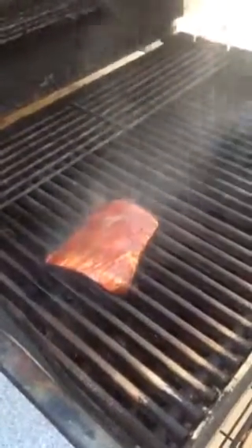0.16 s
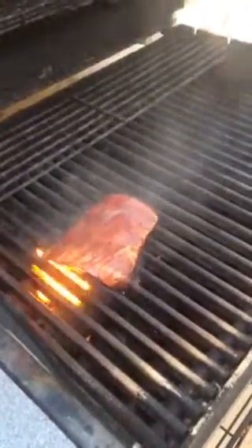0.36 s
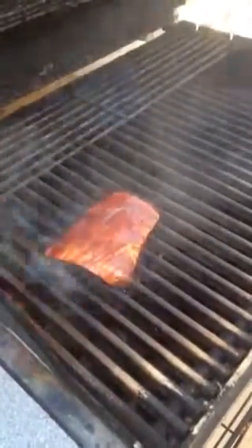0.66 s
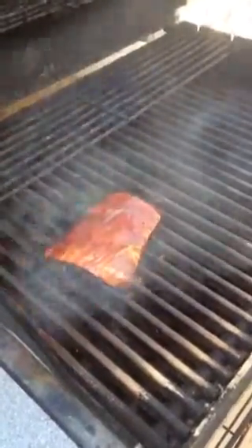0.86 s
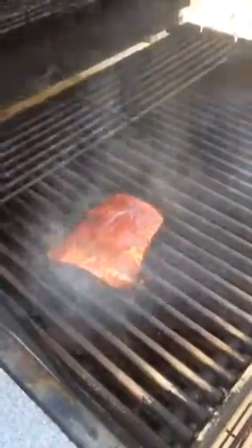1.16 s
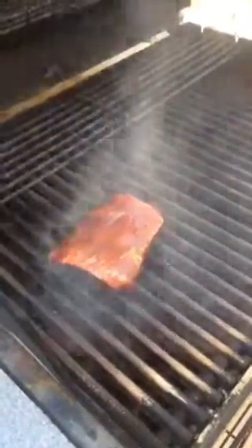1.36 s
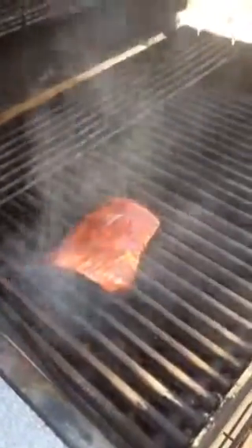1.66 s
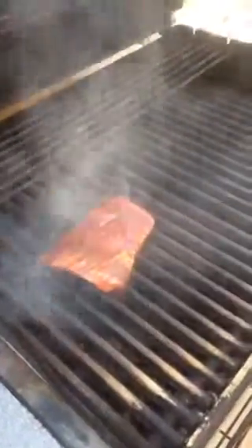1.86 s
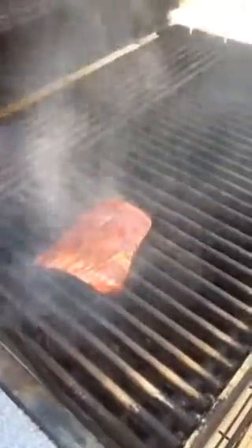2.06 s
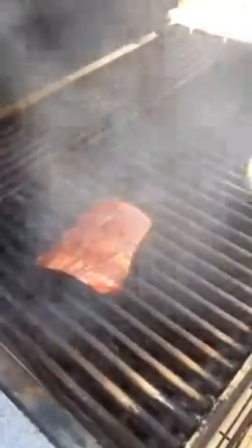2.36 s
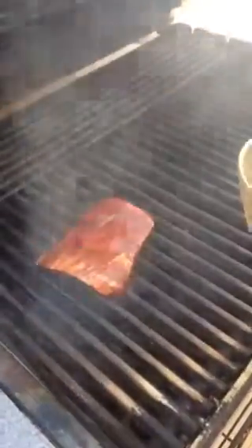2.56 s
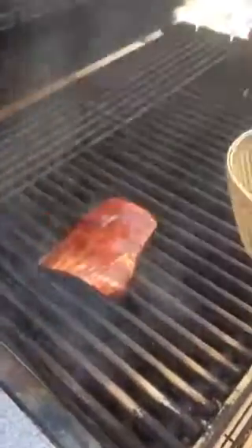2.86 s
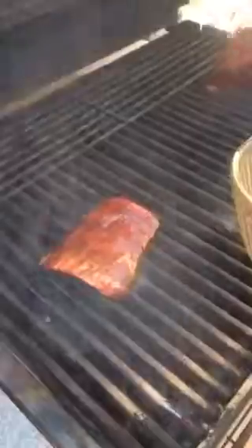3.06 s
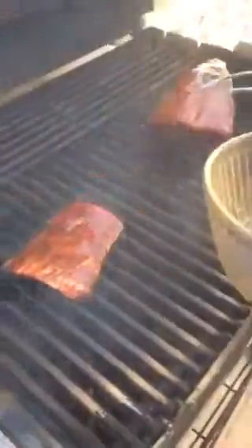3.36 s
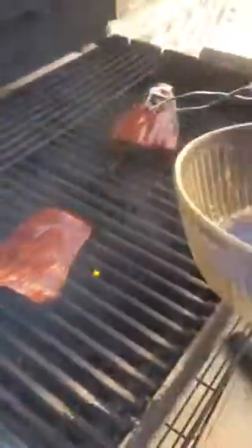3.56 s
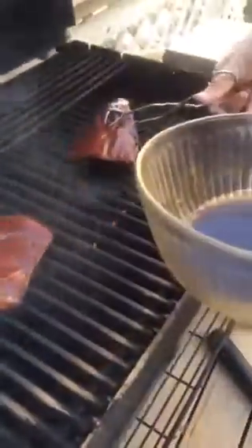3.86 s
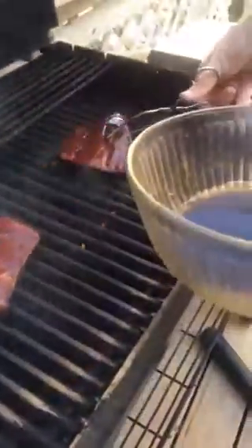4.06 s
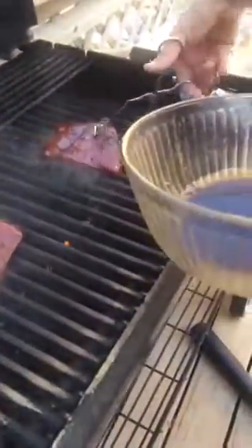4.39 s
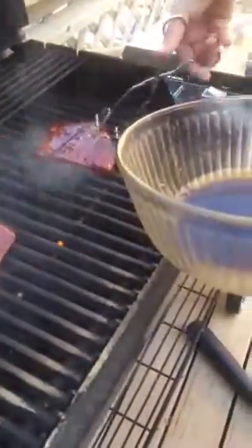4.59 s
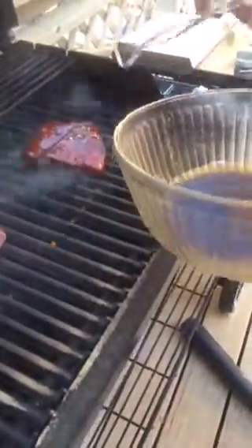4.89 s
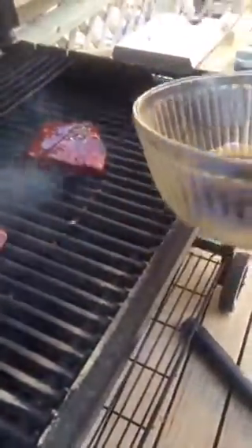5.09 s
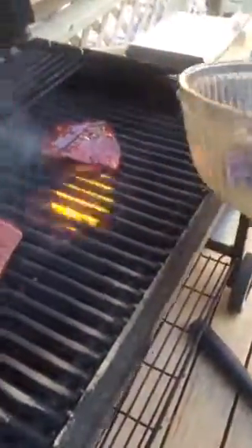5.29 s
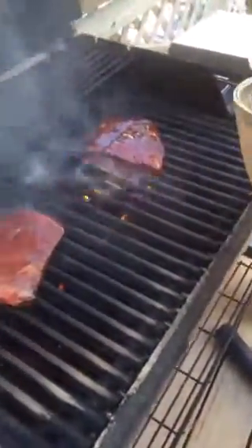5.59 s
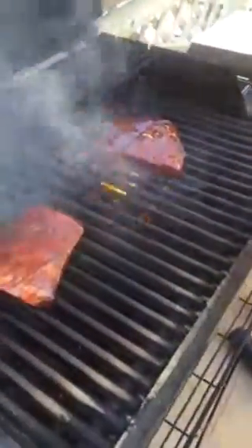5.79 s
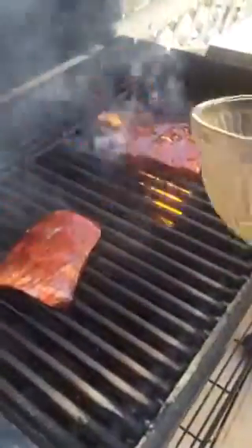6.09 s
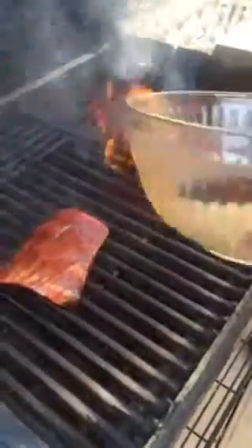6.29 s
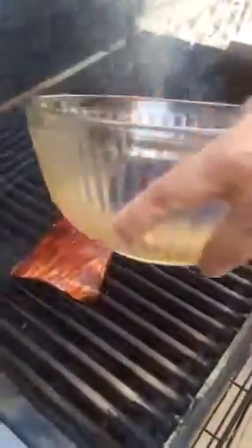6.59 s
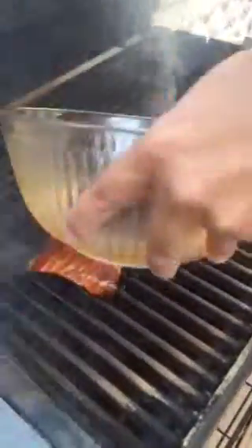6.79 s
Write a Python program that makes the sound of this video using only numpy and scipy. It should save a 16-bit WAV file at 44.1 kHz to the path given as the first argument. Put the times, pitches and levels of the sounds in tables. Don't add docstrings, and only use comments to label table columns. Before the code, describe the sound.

Tongs clink on a glass bowl, then meat sizzles softly on an outdoor grill, growing fiercer with spitting fat, flame flares and rumbling wind.

```python
import sys
import numpy as np
from scipy import signal
from scipy.io import wavfile
from scipy.ndimage import uniform_filter1d

SR = 44100
rng = np.random.default_rng(int(sys.argv[2]) if len(sys.argv) > 2 else 0)


def attenuation_scalar(level_db):
    decades = np.asarray(level_db, float) / 20
    return 10 ** decades


def dump_mix(stems):
    frames = np.atleast_2d(stems).T
    limited = np.clip(frames, -1, 1)
    pcm = np.round(limited * 32767).astype(np.int16)
    wavfile.write(sys.argv[1], SR, pcm)


N = 306054


def evened(x):
    return x / np.sqrt(np.mean(x ** 2) + 1e-20)


def add(mix, s, sound):
    part = mix[round(s * SR):][:len(sound)]
    part += sound[:len(part)]


def clock():
    return np.arange(N) / SR


def column(table, index):
    rows = np.array(table)
    return np.interp(clock(), rows[:, 0], rows[:, index])


def bump(s, half):
    return np.exp(-((clock() - s) / half) ** 2)


def noise():
    return rng.standard_normal(N)


def coloured(x, points):
    f, db = np.transpose(points)
    hz = abs(np.fft.fftfreq(8192, 1 / SR))
    log_gain = np.log(attenuation_scalar(np.interp(np.log(hz + 1), np.log(f), db, -70, -70)))
    response = np.exp(log_gain - 1j * signal.hilbert(log_gain).imag)
    taps = np.fft.ifft(response).real[:4096]
    return signal.oaconvolve(x, taps / np.linalg.norm(taps))[:len(x)]


def flicker(depth_db, seconds):
    size = max(int(seconds * SR), 2)
    wander = uniform_filter1d(uniform_filter1d(noise(), size), size)
    return attenuation_scalar(depth_db * evened(wander))


def bursts(per_s, spread_db):
    size = attenuation_scalar(spread_db * np.minimum(rng.exponential(1, N), 5)) * rng.choice([-1., 1.], N)
    return evened(size * (rng.random(N) < per_s / SR))


def patchy(x):
    depth_db, bins, frames = 1.34, 3, 9
    z = signal.stft(x, nperseg=512, noverlap=384)[2]
    field = uniform_filter1d(rng.standard_normal(z.shape[::-1]), size=frames, axis=0)
    field = evened(uniform_filter1d(field, size=bins, axis=1)).T
    gain = attenuation_scalar(depth_db * field - .115 * depth_db ** 2)
    return signal.istft(z * gain, nperseg=512, noverlap=384)[1][:N]


def spit(points, db, length):
    u = np.arange(1500) / SR / length
    burst = coloured(rng.standard_normal(len(u)) * (1 - np.exp(-4.5 * u)) * np.exp(-u), points)
    return attenuation_scalar(db) * burst / abs(burst).max()


# t/s, level/dB
BOILING = [(0.0, -52), (0.15, -51), (0.37, -47.5), (1.02, -50.5), (1.29, -49.5), (2.16, -54), (3.61, -51),
           (3.81, -47.5), (4.7, -39.5), (5.22, -41), (5.39, -40.5), (5.55, -39.5), (5.74, -40.5),
           (6.11, -37.5), (6.26, -37.5), (6.45, -41.5), (6.69, -44), (6.94, -43.5)]
# centre t/s, level change/dB, half length/s
LULLS = [(.19, 4, .01), (.248, -3, .006), (0.309, -5, 0.028), (.4, -2, .01), (0.56, -2, .03),
         (5.063, -1, .04), (5.192, 4.5, 0.011), (5.238, 1.5, .03), (5.7, 0, .02), (5.84, -3, 0.028),
         (6.295, -4, 0.033), (6.37, -3.5, 0.025)]


def boiling_effort():
    simmer_db, vapour_full_db, lull_reach = -50, 10.5, 0.75
    effort = column(BOILING, index=1) - simmer_db
    lull = sum(db * bump(s, half) for s, db, half in LULLS)
    return effort + lull, np.minimum(effort, vapour_full_db) + lull_reach * lull


def bubbling(sputter, power, crackle, share):
    return evened(sputter ** power * (noise() + share * crackle))


# f/Hz, level/dB
BOIL = [(250, -49), (400, -19.5), (930, -17), (1150, -6), (1300, -10), (1580, -4), (1700, -7.5), (1850, -2),
        (2000, -4), (2300, -2), (3000, -3), (4000, -30)]


def boil(effort, sputter, crackle):
    boil_db = -55 + 0.5 * effort + 0.29 * (flame_db() - BURNER_DB)
    return coloured(bubbling(sputter, 1.18, crackle, 0.35) * attenuation_scalar(boil_db + 2.5), BOIL)


# f/Hz, level/dB
HOLLOW = [(1500, -51), (2200, -12.5), (2400, -6.5), (2520, -5), (2630, 1), (2730, 1.5), (2870, -1),
          (3000, -4), (3100, -11), (3400, -17), (4500, -37)]
# centre t/s, level/dB, half length/s
SURGES = [(0.36, -43.5, 0.062), (0.12, -54, .006), (0.41, -44, .012), (4.59, -53, 0.018),
          (5.385, -45, 0.039), (4.03, -48, 0.0082), (4.102, -43, 0.022), (5.621, -32.5, 0.013),
          (5.862, -35, .006), (5.79, -34, 0.0045), (6.872, -40, .01), (5.65, -40, 0.0047),
          (5.782, -34, 0.0086), (5.961, -36, .006), (5.99, -39, 0.0085), (6.132, -37, 0.018),
          (6.173, -43, .004), (6.221, -35, 0.022), (6.559, -40, 0.015)]


def hollow(effort, sputter, crackle):
    ring = bubbling(sputter, 1, crackle, 0.55) * attenuation_scalar(-52.5 + 1.26 * effort + 0.5)
    surges = noise() * sum(attenuation_scalar(db) * bump(s, half) for s, db, half in SURGES)
    return coloured(ring + surges, HOLLOW)


# f/Hz, level/dB
JETS = [(2600, -26), (3200, -0.5), (3900, -6.5), (4700, -6), (5100, -18.5), (6500, -60)]


def jets(vapour, facing, sputter, crackle):
    jets_db = -59 + 0.79 * vapour + 0.26 * facing
    return coloured(bubbling(sputter, 1, crackle, 0.37) * attenuation_scalar(jets_db + 1.6), JETS)


def steam_level(vapour, facing):
    return -62.5 + 0.86 * vapour + 0.3 * facing


# f/Hz, level/dB
STEAM = [(3500, -31), (5000, -3), (5600, -2.5), (6400, -3), (7000, -1.5), (7700, -4), (9500, -8.5),
         (11500, -18.5), (14000, -58)]


def steam(steam_db, sputter, crackle, drift):
    return coloured(bubbling(sputter, 0.52, crackle, 0.72) * attenuation_scalar(steam_db + 1.2) * drift, STEAM)


# f/Hz, level/dB
MIST = [(5000, -28), (8500, 0.5), (11000, -1.5), (13000, -5), (15500, -8)]


def mist(vapour, facing, sputter, crackle, drift):
    mist_db = -68 + 0.25 * vapour + facing
    return coloured(bubbling(sputter, 0.5, crackle, 0.49) * attenuation_scalar(mist_db + 5.0) * drift, MIST)


# f/Hz, level/dB
DRYING = [(1500, -23), (1950, -11), (2300, -11), (2550, 8), (2900, -5.5), (3400, -7.5), (4500, -53)]


def drying(sputter, crackle):
    start_db, db_per_s = -53.5, 2.05
    return coloured(bubbling(sputter, 1, crackle, 0.75) * attenuation_scalar(start_db - db_per_s * clock()), DRYING)


# f/Hz, level/dB
SPRAY = [(3000, -35), (5000, 20.5), (9000, 16), (15500, 0)]


def pops(steam_db):
    return coloured(bursts(per_s=70, spread_db=2.0) * attenuation_scalar(steam_db - 9.0), SPRAY)


# t/s, level/dB
FACING = [(0, 0), (.5, 0), (.8, 1.5), (1.2, -0.5), (1.45, 2), (2.05, -1), (2.3, -2), (2.45, 1), (3.0, 0),
          (3.3, -9), (3.45, -4), (3.65, -5.5), (4.1, 0.5), (5.2, 0), (5.85, 4.5), (6.3, 1.5), (6.94, 0.5)]


def sizzle():
    effort, vapour = boiling_effort()
    facing = column(FACING, index=1)
    sputter = flicker(0.73, 0.0017) * flicker(0.34, 0.028) * flicker(0.17, 0.011)
    sputter = sputter ** (1 + 0.011 * effort.clip(0))
    drift = flicker(0.52, 0.029)
    crackle = bursts(per_s=2500, spread_db=1.0) + 0.51 * bursts(per_s=240, spread_db=1.3)
    steam_db = steam_level(vapour, facing)
    out = boil(effort, sputter, crackle) + hollow(effort, sputter, crackle)
    out += jets(vapour, facing, sputter, crackle) + steam(steam_db, sputter, crackle, drift)
    out += mist(vapour, facing, sputter, crackle, drift) + drying(sputter, crackle)
    return pops(steam_db) + patchy(out)


# f/Hz, level/dB
WIND = [(13, -62), (22, -33), (39, 0), (67, 6), (124, 4.5), (200, -3), (260, -38), (440, -120)]
# t/s, level/dB
GUSTS = [(0, -57), (.3, -55.5), (.65, -61), (1.4, -57), (1.8, -62), (2.2, -58.5), (3.05, -62),
         (3.28, -51.5), (3.5, -64), (3.95, -62), (4.3, -68), (5.1, -61.5), (5.5, -61), (5.7, -57.5),
         (6.1, -61), (6.94, -62)]


def wind():
    return coloured(noise() * flicker(2.04, 0.012), WIND) * attenuation_scalar(column(GUSTS, index=1) + 2.0)


BURNER_DB = -66
# start t/s, burn/s, level/dB
FLARES = [
    (.33, 0.059, -49.5),
    (.58, 0.27, -65.5),
    (1.15, 0.76, -59.5),
    (3.55, 1, -69),
    (4.5, 0.52, -60),
    (5.27, 0.23, -47.5),
    (5.56, 0.27, -49),
    (5.84, 0.36, -44),
    (6.3, 0.36, -52),
    (6.83, .2, -45),
]


def flame_db():
    catch_s, die_db_per_s = 0.027, 70.
    t, power = clock(), attenuation_scalar(2 * BURNER_DB)
    for s, burn, db in FLARES:
        dying_db = die_db_per_s * (t - s - burn).clip(0)
        power = power + np.clip((t - s) / catch_s, 0, 1) * attenuation_scalar(2 * (db - dying_db))
    return 10 * np.log10(power)


# f/Hz, level/dB
FLAME = [(59, -6), (100, -15.5), (124, -6.5), (200, -2.5), (298, -9.5), (340, -18.5), (500, -16),
         (579, -19.5), (735, -17), (900, -18.5), (1170, -8.5), (1980, -120)]


def flames():
    return coloured(noise() * flicker(2.4, 0.021), FLAME) * attenuation_scalar(flame_db() - 2.0)


# f/Hz, level/dB
MURMUR = [(350, -50), (520, -18), (620, -1.5), (750, 1), (950, -3.5), (1050, -7), (1400, -0.5),
          (2000, -13.5), (3000, -67)]


def traffic():
    passing_db = 3 * bump(2.15, 0.086)
    hidden_db = -7 * (1 + np.tanh((clock() - 2.82) / 0.29)) / 2
    return coloured(noise() * flicker(1.46, 0.016), MURMUR) * attenuation_scalar(-57 + passing_db + hidden_db)


# f/Hz, level/dB
YARD = [(20, -41), (45, -1.5), (90, -9), (250, -12.5), (400, -11.5), (1000, -32), (3000, -50)]


def yard():
    return coloured(noise(), YARD) * attenuation_scalar(-68)


# centre t/s, half length/s, level/dB, f/Hz, width/Hz
WHEEZES = [
    (.04, 0.067, -58, 3850, 500),
    (0.107, .04, -51.5, 3380, 200),
    (0.762, 0.086, -56, 4150, 600),
    (4.076, 0.067, -58, 4300, 700),
]


def wheezes():
    out = np.zeros(N)
    for s, half, db, hz, width in WHEEZES:
        t = np.arange(-.2, .2, 1 / SR)
        complex_noise = [1, 1j] @ rng.standard_normal((2, len(t)))
        fuzz = signal.lfilter([1], [1, -np.exp(-np.pi * width / SR)], complex_noise)
        whistle = evened((fuzz * np.exp(2j * np.pi * hz * t)).real)
        sound = whistle * attenuation_scalar(db) * np.exp(-(t / half) ** 2)
        add(out, max(s + t[0], 0), sound[t > -s])
    return out


# t/s, peak level/dB
CLINKS = [
    (0.169, -20.5),
    (0.213, -14),
    (0.2545, -22.5),
    (0.4105, -19.5),
]
# f/Hz, t60/s, level/dB at each of the four knocks
BOWL = [(313, 0.14, -53, -57, -43, -33), (472, 0.19, -40.5, -31, -31, -25),
        (734, 0.027, -32, -9.5, -30, -11), (1128, 0.08, -25, -16.5, -23, -13),
        (1375, 0.047, -10, -12, -27, -8), (2097, 0.16, -15, -14.5, -7, -8.5),
        (2430, 0.038, -1, -0.5, -19, -3), (2564, 0.12, -14, -12, -7, -2), (3100, 0.025, -4, -1.5, -15, 0),
        (3250, 0.047, -3.5, -28, -20, -5), (3860, 0.051, -25, -17, -21, -7.5),
        (4545, 0.043, -6.5, 3, -15, -3), (6110, 0.065, -21, -22, -24, -19.5),
        (6700, 0.017, -30, -18, -30, -30)]


def tongs():
    out, t = np.zeros(N), np.arange(12000) / SR
    for knock, (s, db) in enumerate(CLINKS):
        modes = sum(attenuation_scalar(levels_db[knock] - 60 * t / t60) * np.sin(2 * np.pi * (hz * t + rng.random()))
                    for hz, t60, *levels_db in BOWL)
        tick = uniform_filter1d(rng.standard_normal(len(t)), size=4) * np.exp(-t / 0.0041)
        add(out, s, attenuation_scalar(db - 7.5) * (modes * (1 - np.exp(-t / 0.0013)) + 0.22 * tick))
        add(out, s, spit(SPRAY, db - 23.0, 0.0033))
    return out


# centre t/s, peak level/dB, f/Hz, lean/rad, narrowness/1
PUFFS = [(0.366, -37, 166, -0.12, 0.82), (0.468, -48, 210, 0.47, 0.34), (1.27, -54, 310, 0.38, .25),
         (2.108, -37.5, 120.7, -0.24, 1.6), (3.297, -18.5, 84.4, 0.35, 2.3), (3.384, -29, 83.5, 0.17, 1.9),
         (6.111, -31.5, 208, 0.22, 0.67), (6.3144, -26, 130, -0.28, 1.86), (6.316, -31, 70, -0.48, 1.3),
         (6.359, -23.5, 78, -1.5, 1.44), (6.35, -36.5, 193, 0.27, 0.59)]


def puffs():
    out, t = np.zeros(N), np.arange(-1500, 1500) / SR
    for s, db, hz, lean, narrow in PUFFS:
        swing = np.cos(2 * np.pi * hz * t + lean)
        add(out, s + t[0], -attenuation_scalar(db) * np.exp(-(narrow * hz * t) ** 2) * swing)
    return out


# f/Hz, level/dB
THUD = [(120, 0), (300, -2.5), (700, 16), (1100, -7), (2500, -45)]
# t/s, peak level/dB, treble level/dB, thud level/dB
SPITS = [(0.592, -32, -23, -29), (0.604, -33, -29.5, -33), (0.6797, -31, -15, -29), (1.413, -46, -7, -5),
         (1.767, -47, -27.5, -8), (2.0714, -38, -23, -11), (3.191, -46, -22, -2), (4.152, -36.5, -10, -10),
         (4.582, -39, -27, -27), (5.099, -35.5, -22, -15), (5.1484, -28, -27, -41), (5.195, -34, -12, -32),
         (5.424, -27, -22, -26), (5.555, -26, -23, -30), (5.668, -21, -14, -24), (5.721, -29, -8, -29),
         (5.7345, -24, -31, -30), (5.7594, -20, -28, -37), (5.7683, -24, -19, -33), (5.856, -26, -25, -33),
         (5.876, -34, -13, -29), (5.9137, -24, -12, -35), (5.92, -32, -20, -25), (6.1443, -29.5, -30, -13),
         (6.339, -26.5, -25, -24), (6.537, -26, -7, -28), (6.5743, -36, -22, -13), (6.69, -39, -21, -31),
         (6.8619, -27.5, -14, -27)]


def spits():
    out, length = np.zeros(N), 0.002
    for s, db, treble_db, thud_db in SPITS:
        add(out, s, spit(HOLLOW, db - 1.0, length))
        add(out, s, spit(BOIL, db - 4, length))
        add(out, s, spit(JETS, db - 19, length))
        add(out, s, spit(SPRAY, db + treble_db + 2.0, 0.42 * length))
        add(out, s, spit(THUD, db + thud_db + 3.0, length))
    return out


def scene():
    air = wind() + patchy(flames() + traffic()) + yard()
    return (sizzle() + air + wheezes() + tongs() + puffs() + spits())[None]


def low_pass(x):
    return signal.sosfilt(signal.butter(12, 15830, fs=SR, output="sos"), x)


def record(dry):
    edge = signal.firwin(2047, 15290, window=("kaiser", 9), fs=SR)
    mix = signal.oaconvolve(dry, edge[None], "same")
    return low_pass(mix)


dry = scene()
out = record(dry)
dump_mix(out)
```